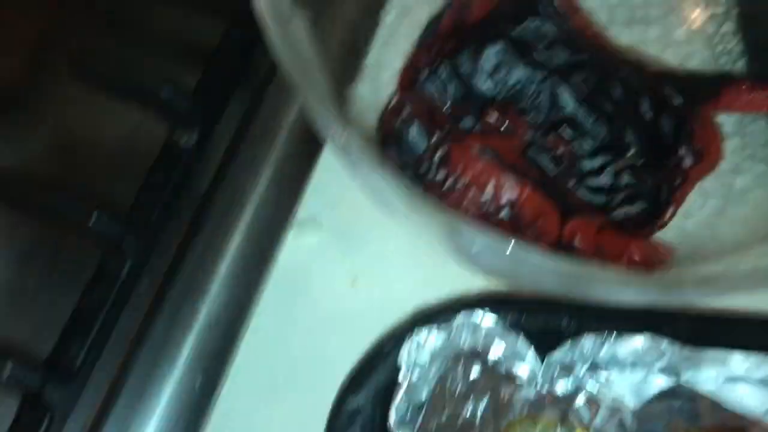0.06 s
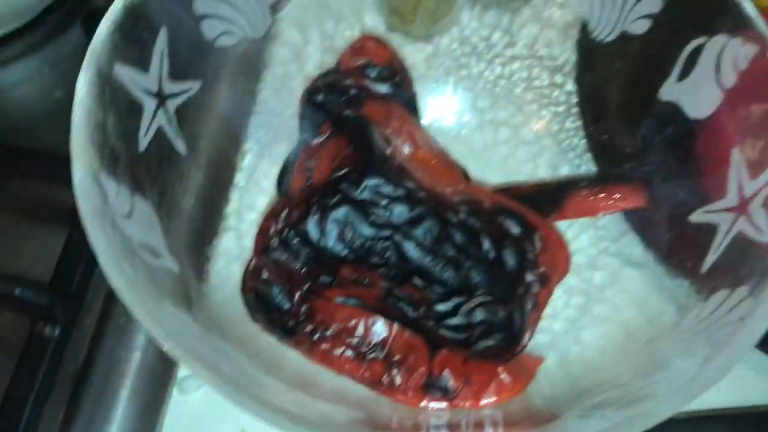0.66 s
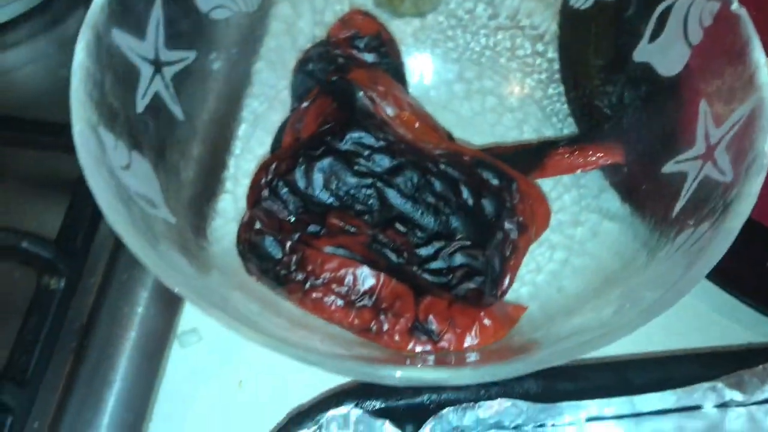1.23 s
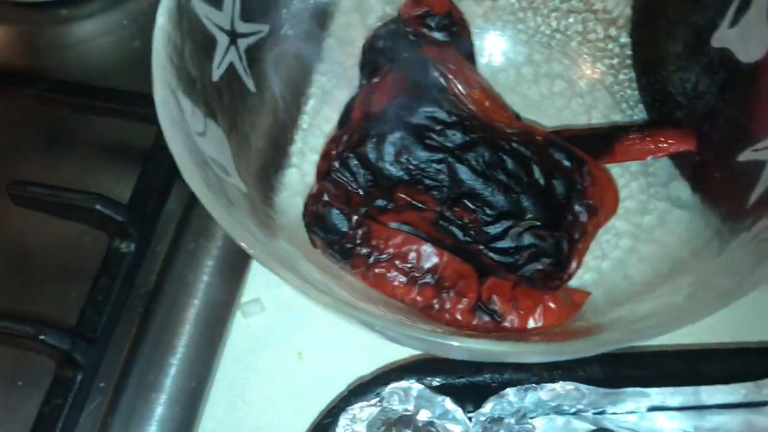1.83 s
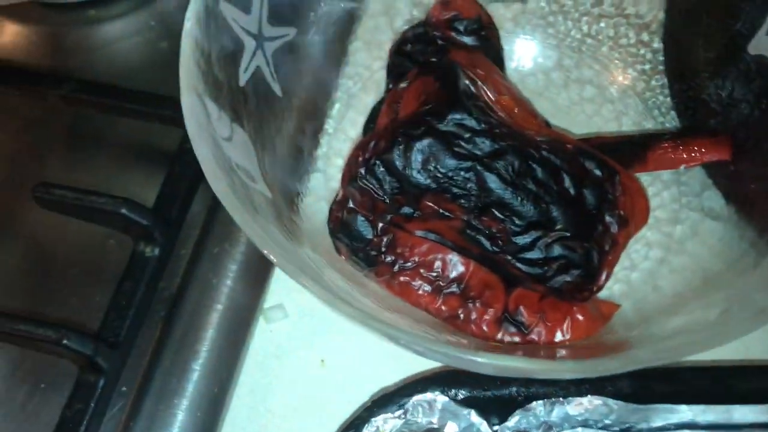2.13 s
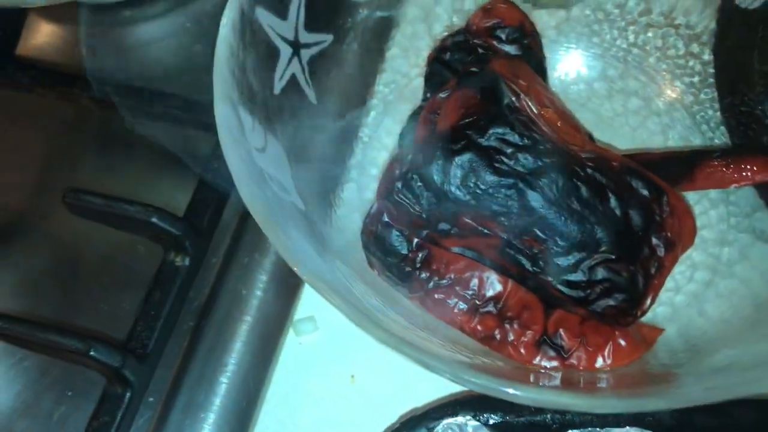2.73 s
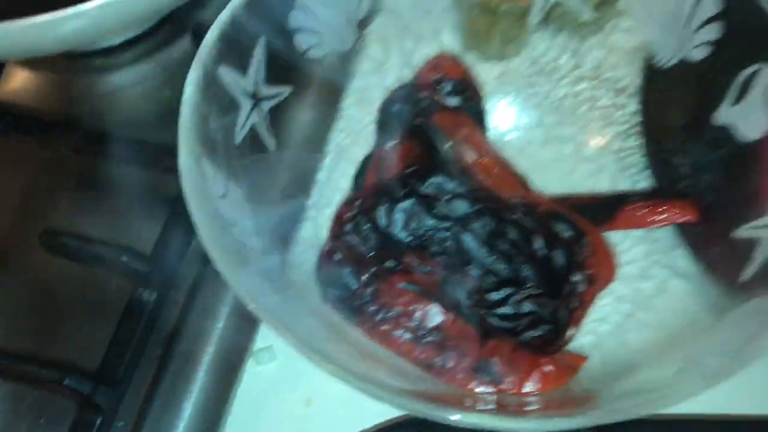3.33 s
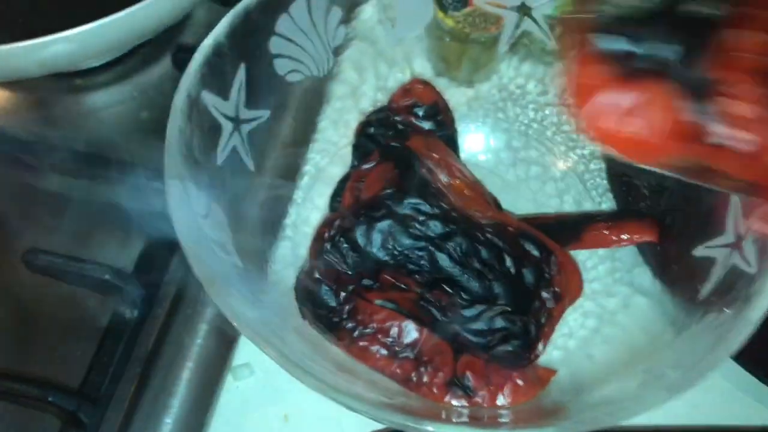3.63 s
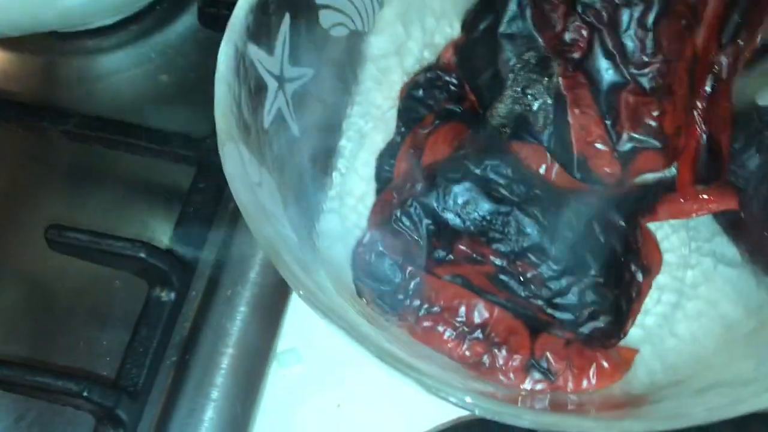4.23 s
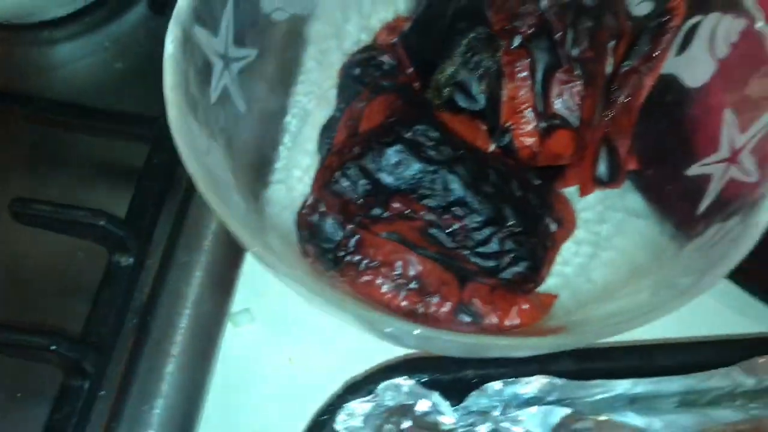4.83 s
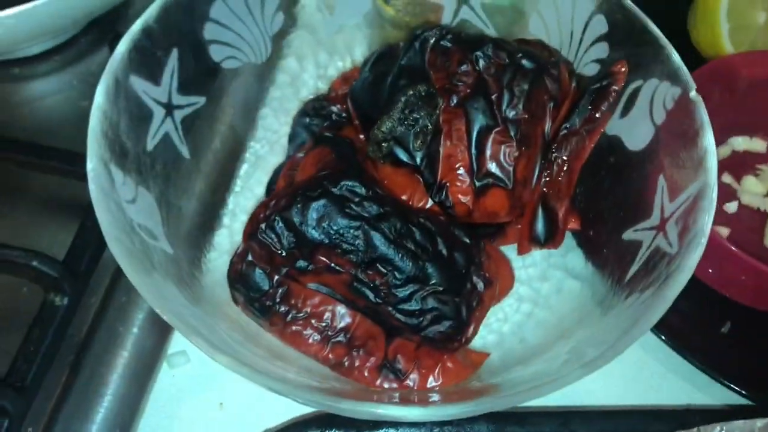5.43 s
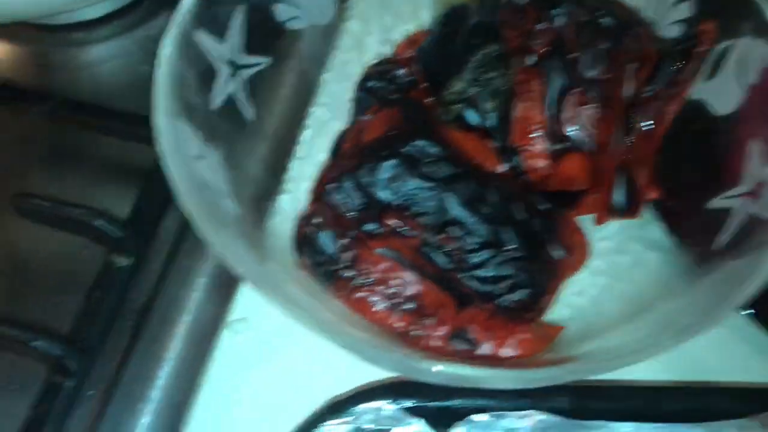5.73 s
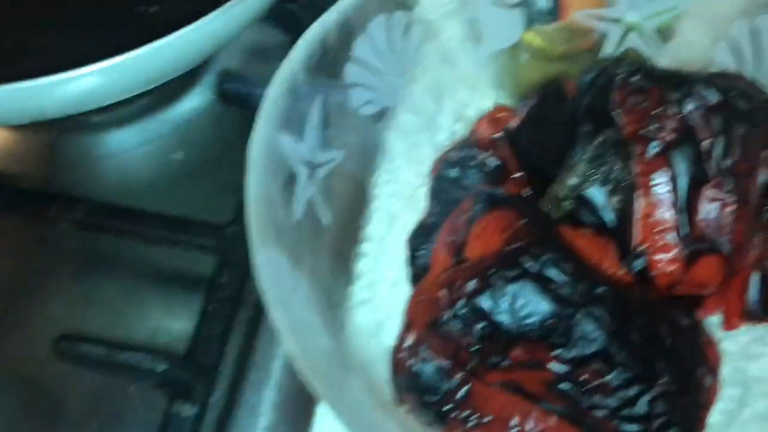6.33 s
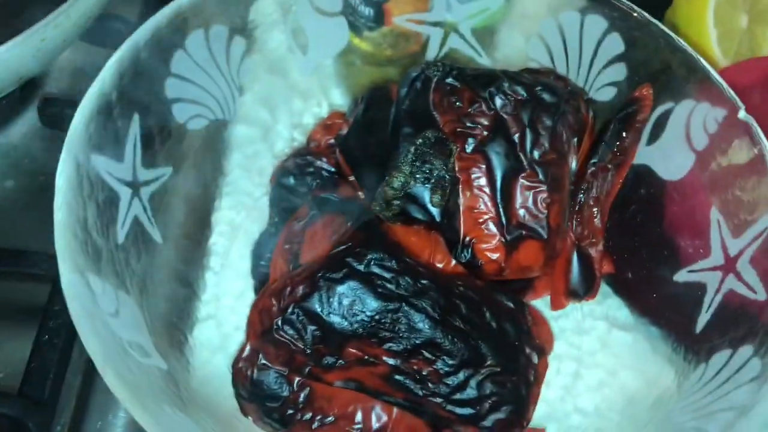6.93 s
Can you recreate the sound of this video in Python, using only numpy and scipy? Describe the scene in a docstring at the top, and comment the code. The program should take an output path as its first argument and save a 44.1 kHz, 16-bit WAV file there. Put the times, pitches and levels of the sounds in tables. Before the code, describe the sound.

Juice spits faintly on a hot tray before metal tongs set its foil lining crackling and snapping for about two seconds. A soft, wet flop and two clinks follow as a pepper lands in a glass bowl, leaving a lingering ring. Then come a short crinkle, a knock on the worktop, a close finger tap and a last rustle of foil. Soft handling bumps and quiet kitchen hush lie underneath.

```python
"""In a small kitchen, roasted peppers are lifted from a foil-lined tray into a glass bowl.
The foil crinkles in bursts as metal tongs dig under a pepper, and juice spits faintly on the hot tray.
The pepper flops into the bowl and the tongs clink twice on the glass, which rings on.
The tongs are put down with a knock, a finger taps close by, and the foil is grabbed again.
Soft handling bumps and a low, steady hush lie underneath."""
import sys
import numpy as np
from scipy import signal
from scipy.fft import rfft, irfft
from scipy.io import wavfile
from scipy.ndimage import uniform_filter1d

SR = 44100
rng = np.random.default_rng(int(sys.argv[2]) if len(sys.argv) > 2 else 0)


def unload_wav(signal):
    """Save mono or channel-first audio to the path in sys.argv[1] as 16-bit WAV at rate SR, clipped to [-1, 1]."""
    wavfile.write(
        sys.argv[1],
        SR,
        np.round(np.clip(np.atleast_2d(signal).T, -1, 1) * 32767).astype(np.int16),
    )


N = 306936
TIME = np.arange(N) / SR


# The tone of foil (a tone table says how strong each pitch is): pitch_hz, level_db
FOIL_TONE = [(100, -16), (260, -16.5), (490, -13.5), (700, -19.5), (1000, -8.5), (1300, -7.5), (1750, -7.5),
             (2700, 0), (3700, -0.5), (6000, -0.5), (7500, -3), (9400, 1.5), (11000, -4), (16000, -7.5)]
# Pushes on the foil; treble and body count from the push's own level:
# start_s, swell_s, hold_s, level_db, treble_db, body_db, pitch_hz
FOIL_PUSHES = [(1.276, .005, 0.019, -45, -2, -5.5, 5400), (1.33, 0.043, 0.022, -32.5, -9.5, -7, 3900),
               (1.49, .005, 0.023, -57, 8, -7, 3900), (1.513, 0.02, 0.0057, -41.5, -13, -6, 4300),
               (1.608, .028, 0.023, -31.5, -4.5, -13, 5100), (1.649, 0.023, 0.057, -34.5, -10, -8, 3900),
               (1.777, .025, 0.2, -49, -10, -5.5, 3800), (1.951, 0.046, 0.031, -34, -8, -9, 3920),
               (2.045, 0.017, 0.067, -53.5, -9, -4.5, 3500), (2.141, 0.1, 0.036, -33.5, -6.5, -7, 3470),
               (2.307, 0.02, 0.053, -48.5, -15, -2, 3580), (2.407, 0.013, 0.095, -44, -7.5, -7, 3370),
               (2.503, 0.061, 0.049, -36, -7, -9, 3400), (2.71, 0.038, .004, -35.5, -11, -6, 3900),
               (2.755, 0.034, 0.051, -32.5, -4.5, -4.5, 3470), (2.888, 0.058, 0.034, -33.5, -6.5, -9, 3500),
               (2.993, 0.023, 0.016, -38, -18, -4, 2710), (3.099, 0.02, 0.027, -44, -4.5, -7.5, 3900),
               (3.144, 0.015, 0.039, -51, -2.5, -6.5, 3580), (5.14, 0.0091, 0.0048, -23, -7, -17, 4230),
               (5.193, 0.01, 0.0071, -36.5, -11.5, -11.5, 3900), (5.257, .028, 0.0088, -30, -6, -7, 3500),
               (5.331, 0.044, 0.041, -41, -7.5, -8.5, 2920), (5.434, 0.015, 0.0035, -40.5, -4, -4.5, 4200),
               (6.703, .011, 0.34, -35.5, 0.5, -9.5, 4500), (6.708, 0.062, 0.039, -28, 5, -15.5, 4600),
               (6.922, 0.031, .01, -39, 10, -10, 4800)]

def foil_crinkles():
    """Each push makes many tiny buckles: sharp creases sound bright, broad dents move the whole sheet."""
    buckles = coloured(tiny_buckles(per_s=900, spread_db=2, fade_s=0.013, ping_gain=0.27), FOIL_TONE)
    push_powers = np.array([hand_stroke(*push[:4]) ** 2 for push in FOIL_PUSHES]) + 1e-18
    treble_db, body_db, pitch_hz = np.transpose(FOIL_PUSHES)[4:]
    total_power = push_powers.sum(axis=0)
    blended_hz = pitch_hz @ push_powers / total_power  # louder pushes count for more
    middle = np.sqrt(total_power) * foil_patches(buckles, blended_hz, db_per_octave=13.5)
    treble = np.sqrt(from_db(treble_db) ** 2 @ push_powers) * unit_level(band(buckles, 8170, "high"))
    body = np.sqrt(from_db(body_db) ** 2 @ push_powers) * unit_level(band(buckles, 1900, "low"))
    return from_db(-2) * (middle + treble + body)


def tiny_buckles(per_s, spread_db, fade_s, ping_gain, patches=14):
    """Buckles of random size each ring one small patch of foil; the average loudness is kept even."""
    sizes = from_db(spread_db * np.minimum(rng.exponential(1, N), 3)) * rng.choice([-1, 1], N)
    buckles = sizes * (rng.random(N) < per_s / SR)
    patch_hit = rng.integers(0, patches, N)
    crackle = np.zeros(N)
    for patch, hz in enumerate(np.geomspace(1500, 14000, patches)):
        noise = dying_noise(fade_s)
        one_buckle = unit_level(noise) + ping_gain * unit_level(ring(noise, hz, 10 / hz))
        crackle += signal.oaconvolve(buckles * (patch_hit == patch), one_buckle)[:N]
    local_power = np.abs(uniform_filter1d(crackle ** 2, size=900))
    return crackle / np.sqrt(local_power + 1e-9)


def foil_patches(buckles, pitch_hz, db_per_octave):
    """Large patches of foil sound low and small ones high; the pitch sets the mix of the two."""
    large = unit_level(band(buckles, [2000, 3500], "band"))
    small = unit_level(band(buckles, [3500, 7000], "band"))
    balance = from_db(db_per_octave * np.log2(pitch_hz / 3450))
    return (large + balance * small) / np.sqrt(1 + balance ** 2)


# Single creases giving way; treble counts from the crease's own level:
# start_s, level_db, treble_db, ping_hz, fade_s (a fade is the time taken to drop by 60 dB)
CREASE_SNAPS = [(0.9677, -19.5, -14, 3510, 0.026), (1.282, -27, -16, 6370, 0.032),
                (1.3226, -29, -23, 3200, 0.038), (1.3714, -17.5, -12.5, 2630, 0.039),
                (1.3961, -12, -18.5, 3610, 0.069), (1.4352, -25, -13, 2640, 0.062),
                (1.5429, -21, -20.5, 3290, 0.032), (1.5922, -22.5, -19.5, 3700, 0.049),
                (1.6132, -20.5, -23, 5760, 0.032), (1.6316, -14.5, -10, 5300, 0.034),
                (1.6638, -12, -20, 5820, 0.047), (1.8675, -24.5, -16.5, 3540, 0.035),
                (1.9649, -19, -17, 4300, 0.032), (1.9753, -18.5, -24, 3070, 0.033),
                (2.0056, -20.5, -6.5, 2690, 0.039), (2.028, -17.5, -18.5, 4240, 0.058),
                (2.172, -24, -19, 3660, 0.063), (2.2104, -33, -13, 2300, 0.035),
                (2.356, -27.5, -12.5, 3280, 0.038), (2.374, -19.5, -28, 3770, 0.024),
                (2.4177, -27, -14, 3000, 0.035), (2.4882, -30, -18, 3240, 0.035),
                (2.6222, -15, -25, 2750, 0.028), (2.6557, -22.5, -13.5, 5450, 0.046),
                (2.738, -22.5, -10, 3370, 0.052), (2.7451, -13.5, -19, 4100, 0.035),
                (2.7717, -18.5, -17, 2680, 0.032), (2.8524, -18, -18, 5530, 0.037),
                (2.9175, -20, -28, 3820, 0.035), (3.0149, -25.5, -28, 2290, 0.041),
                (5.0888, -35, -23, 5850, 0.038), (5.1441, -21, -10, 5210, 0.041),
                (5.1996, -17, -17, 4350, 0.028), (5.236, -22, -21, 2730, 0.039),
                (5.2689, -21, -20, 4040, 0.038), (5.3742, -20.5, -18.5, 2290, 0.046),
                (5.4122, -25, -11, 3040, 0.035)]

def foil_snaps():
    """Larger creases let go with a crack and a metallic ping that the sheet quickly stops."""
    middle = bursts((s, db - 9, fade) for s, db, _, _, fade in CREASE_SNAPS)
    treble = bursts((s, db + treble_db + 1, fade * 1.1) for s, db, treble_db, _, fade in CREASE_SNAPS)
    cracks = band(middle, [700, 7000], "band") + band(treble, 7000, "high")
    pings = sum(ring(clicks([s], [db - 12]), hz, fade_s=0.028) for s, db, _, hz, _ in CREASE_SNAPS)
    return pings + coloured(cracks, FOIL_TONE)


# The notes the glass bowl rings with: pitch_hz, level_db, fade_s
BOWL_NOTES = [(458, -55, 1.1), (1075.5, -38.5, 2.2), (2893, -42, .62), (4062, -34, 0.4), (4495, -53, .3),
              (5313, -47, .3), (5462, -42, .35), (6916, -39, .3), (8091, -40, .22), (8204, -41, .2),
              (8656, -38, 0.22), (9415, -44, 0.2), (9943, -47, .2), (10810, -44, .17), (11773, -43, .18),
              (12478, -38, .16), (12952, -38, .16), (13889, -47, .16), (14355, -43, .18), (14540, -46, .16)]
# Its strongest note, split in two by the uneven rim so it swells and wobbles: pitch_hz, level_db, fade_s
RIM_NOTES = [(1897.4, -41, 1.2), (1889.2, -50, 1.3)]
# Hits that ring the bowl, each favouring one pitch: start_s, level_db, favoured_hz, boost_db
BOWL_STRIKES = [(4.208, 1.5, 1096, 0), (4.356, -7, 1890, 18.5), (5.461, -33.5, 1893, 28)]

def glass_bowl():
    """The glass rings after every hit, most of all with the note that moves that spot the most."""
    start_s, hit_db, favoured_hz, boost_db = np.transpose(BOWL_STRIKES)

    def note(hz, note_db, fade_s):
        """One note, set ringing by all the hits."""
        nearness = np.exp(-(np.log2(hz / favoured_hz) / 0.3) ** 2)
        return ring(clicks(start_s, hit_db + note_db + boost_db * nearness), hz, fade_s)

    # the uneven rim gives each high note a quieter, slightly lower twin
    twins = sum(note(hz * 0.997, db - 6.5, fade) for hz, db, fade in BOWL_NOTES[2:])
    rim = note(*RIM_NOTES[0]) - note(*RIM_NOTES[1])  # the two start by swinging opposite ways
    return sum(note(*row) for row in BOWL_NOTES) + twins + rim


# The tongs chattering on the glass: start_s, clash_db, fade_s, steel_db
TONG_CLINKS = [(4.2071, -17, 0.049, -12), (4.214, -27, 0.046, -26), (4.228, -25.5, 0.22, -18),
               (4.355, -22, 0.041, 0.5), (4.376, -30.5, 0.077, -7.5)]
# The tone of that clash: pitch_hz, level_db
CLASH_TONE = [(180, -42.5), (300, -7), (701, -22.5), (1060, -0.5), (1720, -17.5), (1900, 3), (2480, -21.5),
              (4160, -17), (4750, -30), (5430, 1.5), (6000, -23), (8360, -9.5), (16000, -21.5)]
# The notes of the steel: pitch_hz, level_db, fade_s
STEEL_NOTES = [(5410, -17.5, .07), (5459, -20.5, .07), (8150, -31, .06), (8680, -30, 0.074),
               (12950, -30, .05), (15375, -38, .07)]

def tong_clinks():
    """Steel chatters on the rim: a noisy clash that stirs the glass's high notes, and a bright ring."""
    start_s, clash_db, fade_s, steel_db = np.transpose(TONG_CLINKS)
    blows = clicks(start_s, steel_db)
    # taking away a very short ring lets each note build up while steel and glass touch
    steel = sum(from_db(db + 2.5) * (ring(blows, hz, fade) - ring(blows, hz, fade_s=0.0046))
                for hz, db, fade in STEEL_NOTES)
    chatter = bursts(zip(start_s, clash_db, fade_s))
    glass = sum(from_db(db) * ring(chatter, hz, fade_s=0.071) for hz, db, _ in BOWL_NOTES[2:])
    glass = from_db(-2.5) * np.std(chatter) * unit_level(glass)
    return steel + glass + from_db(-4) * coloured(chatter, CLASH_TONE)


# The tongs landing on the worktop: start_s, level_db
LANDING = [(5.4607, -1.5)]
# The notes of the worktop: pitch_hz, level_db, fade_s
WORKTOP_NOTES = [(1180, -22, .02), (1613, -11, 0.0238), (1867, -8, 0.03), (2290, -11, 0.017),
                 (2815, -22, 0.052), (3900, -25, 0.048), (5700, -31, 0.0412)]
# The dull thud that follows: start_s, level_db, fade_s
THUDS = [(5.4615, -21.5, 0.057), (5.470, -38.5, 0.41)]
# The tone of the thud: pitch_hz, level_db
THUD_TONE = [(21, -29), (50, 0.5), (135, -9), (400, -5.5), (700, -5), (786, -19), (946, -4.5), (1110, -4.5),
             (1940, -8), (2130, -18), (3900, -22.5), (9000, -35), (11700, -69), (19800, -120)]
# Faint slides over the worktop: start_s, swell_s, hold_s, level_db
WORKTOP_SLIDES = [(5.465, .03, 0.547, -63), (6.105, 0.044, 0.0091, -53)]
# The tone of the sliding: pitch_hz, level_db
SLIDE_TONE = [(200, -1.5), (1400, 0), (3000, -4), (5800, -5), (8000, -19.5), (15000, -24.5)]

def worktop_knock():
    """The tongs are put down: a blunt blow rings the worktop, with a thud and faint sliding."""
    blow = band(clicks(*np.transpose(LANDING)), 6700, "low")
    knock = sum(from_db(db) * ring(blow, hz, fade) for hz, db, fade in WORKTOP_NOTES)
    rubbing = coloured(rng.standard_normal(N), SLIDE_TONE)
    slides = sum(hand_stroke(*row) for row in WORKTOP_SLIDES) * rubbing
    return band(knock, 340, "high") + coloured(bursts(THUDS), THUD_TONE) + slides


# Juice spitting on the hot tray: start_s, level_db, fade_s
JUICE_SPITS = [(0.11, -61.5, 0.46), (0.283, -67, 1), (0.515, -59.5, 0.6), (0.828, -59, 0.27),
               (0.972, -53, 0.49)]
# Soft wet pepper ticks, then (last two rows) bright little ticks of the close finger tap:
# start_s, level_db, fade_s
SMALL_TICKS = [(3.963, -51, 0.054), (3.991, -48.5, 0.046), (4.046, -43, 0.051), (4.171, -51, 0.33),
               (4.191, -43, 0.2), (4.457, -45, 0.032), (4.47, -55.5, 0.68), (6.148, -53, 0.087),
               (6.1607, -39.5, 0.02)]
# The tone of the spits and ticks: pitch_hz, level_db
TICK_TONE = [(590, -50), (1000, -6.5), (1290, -4), (1870, -11), (4070, -8), (7880, -7.5), (8650, -4.5),
             (16000, -11.5)]
# The pepper flopping into the bowl: start_s, level_db, fade_s
PEPPER_FLOPS = [(4.209, -27.5, 0.18), (4.357, -39, 0.25)]
# The tone of a flop: pitch_hz, level_db
FLOP_TONE = [(40, -9), (100, -9.5), (200, -4.5), (300, -6.5), (440, 2), (680, -8.5), (950, 1.5), (1400, -7),
             (2100, -6), (3200, -22)]

def peppers_and_ticks():
    """The peppers' spits, ticks and soft landing, and the finger tap's bright ticks, are puffs of noise."""
    ticks = coloured(bursts(JUICE_SPITS + SMALL_TICKS), TICK_TONE)
    return ticks + coloured(bursts(PEPPER_FLOPS), FLOP_TONE)


# Small dry taps close by: start_s, level_db, pitch_hz, fade_s
DRY_TAPS = [(0.9677, -36, 1342, 0.022), (4.049, -27, 1490, 0.009), (6.1508, -20.5, 3500, 0.0006),
            (6.161, -24.5, 900, .014), (6.1656, -6.5, 1215, 0.0018)]

def finger_taps():
    """Each tap is one very short note, with its lower middle pitches turned down."""
    taps = sum(ring(clicks([s], [db]), hz, fade) for s, db, hz, fade in DRY_TAPS)
    return band(taps, 600, "high", order=2) + from_db(-2) * band(taps, 210, "low")


# The notes of the tray under the foil: pitch_hz, level_db, fade_s
TRAY_NOTES = [(55.7, -55.5, 0.24), (511, -47.5, 0.03)]

def tray(foil, digging_ends_s):
    """While the tongs dig under the pepper, each crinkle also shakes the tray."""
    shaking = np.abs(foil) * rng.standard_normal(N) * (TIME < digging_ends_s)
    return sum(from_db(db) * ring(band(shaking, hz * 0.93, "high"), hz, fade)
               for hz, db, fade in TRAY_NOTES)


# Low bumps from handling: start_s, level_db, pitch_hz
LOW_BUMPS = [(0.584, -50.5, 70.0), (1.375, -49, 62), (2.75, -44, 56.5), (2.799, -45, 53.5),
             (5.288, -34.5, 57), (5.773, -46, 135), (5.942, -45.5, 140), (6.072, -45.5, 75.6),
             (6.811, -43, 153)]

def handling_bumps(fade_s):
    """Each bump is a short, deep rumble around its own pitch."""
    bumps = np.zeros(N)
    for s, db, hz in LOW_BUMPS:
        rumble = band(bursts([(s, db - 2, fade_s)]), [hz * 0.5, hz * 1.26], "band", order=1)
        bumps += np.sqrt(SR / 2 / hz) * rumble  # makes up for what the filter takes away
    return band(bumps, 320, "low")


def kitchen_echo(sound, fade_s, treble_limit_hz, echo_db):
    """Adds the wash of echoes from the walls, which starts a moment late and has less treble."""
    tail = band(dying_noise(fade_s), treble_limit_hz, "low", order=1)
    tail[:int(0.004 * SR)] = 0
    tail /= np.sqrt(np.sum(tail ** 2))
    return sound + from_db(echo_db) * signal.fftconvolve(sound, tail)[:N]


# The tone of the quiet room: pitch_hz, level_db
HUSH_TONE = [(12, -42), (20, -12.5), (53, 2.5), (168, -5.5), (187, -5), (228, -2.5), (255, -10.5),
             (337, -11.5), (499, -18.5), (574, -15), (2080, -22), (2530, -23), (3530, -22.5), (4940, -27),
             (16000, -29)]

def room_hush(level_db):
    """A faint, steady noise, strongest in the bass."""
    return from_db(level_db) * coloured(rng.standard_normal(N), HUSH_TONE)


def hand_stroke(start_s, swell_s, hold_s, level_db, rise_db=33, fall_db_per_s=424):
    """The loudness of one hand movement: it builds up ever more slowly, holds, then dies away."""
    gain = np.zeros(N)
    active = (TIME >= start_s) & (TIME < start_s + 1)
    t = TIME[active] - start_s
    swell_left = np.maximum(1 - t / swell_s, 0)
    settling_s = np.maximum(t - swell_s - hold_s, 0)
    gain[active] = from_db(level_db - rise_db * swell_left ** 2 - fall_db_per_s * settling_s)
    return gain


def from_db(db):
    """Turns decibels into a number to multiply by."""
    return 10 ** (np.asarray(db) / 20)


def unit_level(x):
    """Scales a signal so its average power is 1."""
    return x / np.sqrt(np.mean(x ** 2) + 1e-20)


def band(x, hz, kind, order=4):
    """Keeps the low pitches, the high ones or a band; a higher order cuts more sharply."""
    return signal.sosfilt(signal.butter(order, hz, kind, fs=SR, output="sos"), x + 1e-18)


def coloured(x, tone, size=8192):
    """Shapes a sound with a tone table; white noise keeps its power."""
    hz, db = np.transpose(tone)
    octave = np.log2(np.maximum(np.arange(size // 2 + 1) * SR / size, 1))
    octaves_outside = np.abs(octave - np.clip(octave, np.log2(hz[0]), np.log2(hz[-1])))
    gain = unit_level(from_db(np.interp(octave, np.log2(hz), db) - 20 * octaves_outside))
    # make the filter answer as early as it can (minimum phase), so clicks stay sharp
    cepstrum = irfft(np.log(gain + 1e-6))
    cepstrum[1:size // 2] *= 2
    cepstrum[size // 2 + 1:] = 0
    return signal.fftconvolve(x, irfft(np.exp(rfft(cepstrum))))[:N]


def clicks(times_s, levels_db):
    """A one-sample click at each time."""
    out = np.zeros(N)
    out[np.round(np.asarray(times_s) * SR).astype(int)] = from_db(levels_db)
    return out


def ring(x, hz, fade_s):
    """Each click in x starts a pure note of the same height, which fades away."""
    decay = from_db(-60 / (fade_s * SR))
    angle = 2 * np.pi * hz / SR
    return signal.lfilter([0, np.sin(angle)], [1, -2 * decay * np.cos(angle), decay ** 2], x + 1e-18)


def dying_noise(fade_s):
    """Fading noise, like countless close notes ringing at once."""
    t = np.arange(int(fade_s * SR) + 2) / SR
    return rng.standard_normal(len(t)) * from_db(-60 * t / fade_s)


def bursts(rows):
    """A puff of fading noise for each row of start_s, level_db, fade_s."""
    out = np.zeros(N)
    for start_s, level_db, fade_s in rows:
        start = round(start_s * SR)
        burst = dying_noise(fade_s)[:N - start]
        out[start:start + len(burst)] += from_db(level_db) * burst
    return out


def scene():
    """Foil, tray, tongs, peppers, ticks and knock echo in the kitchen; the rest is added without echo."""
    foil = foil_crinkles() + foil_snaps()
    sources = foil + tong_clinks() + tray(foil, digging_ends_s=3.3) + peppers_and_ticks()
    room = kitchen_echo(sources + worktop_knock(), fade_s=0.29, treble_limit_hz=7180, echo_db=-16.5)
    background = room_hush(level_db=-64) + handling_bumps(fade_s=0.16)
    return (room + glass_bowl() + finger_taps() + background)[None]


def record(dry):
    """The small microphone loses the deepest bass; the highest treble is cut steeply."""
    thinned = band(dry, 38, "high")
    return signal.sosfilt(signal.ellip(10, 0.1, 70, 16100, fs=SR, output="sos"), thinned)


dry = scene()
out = record(dry)
unload_wav(out)
```